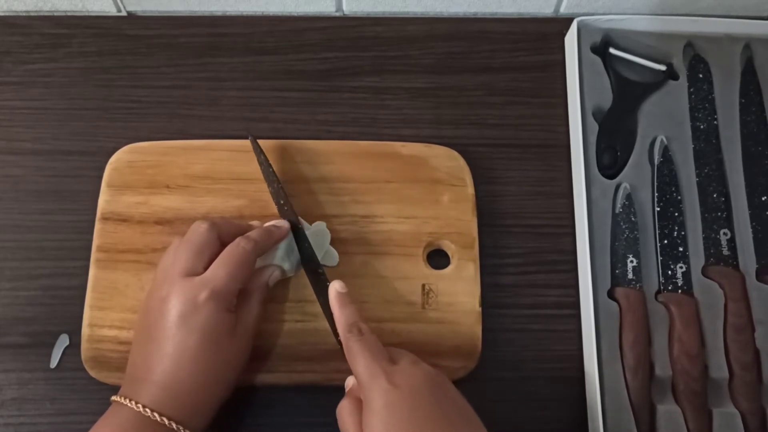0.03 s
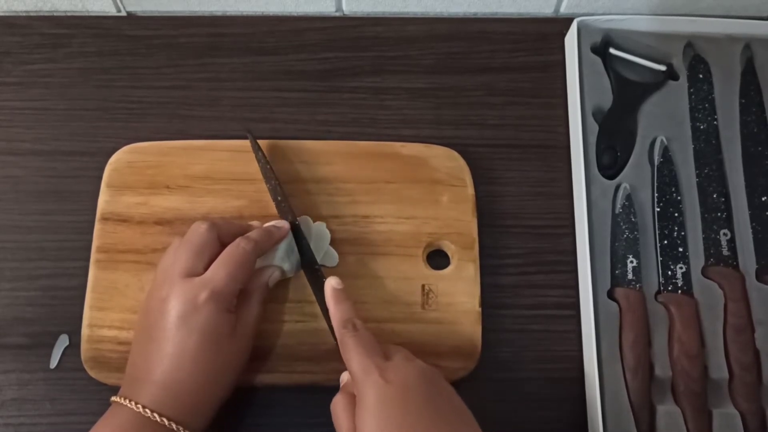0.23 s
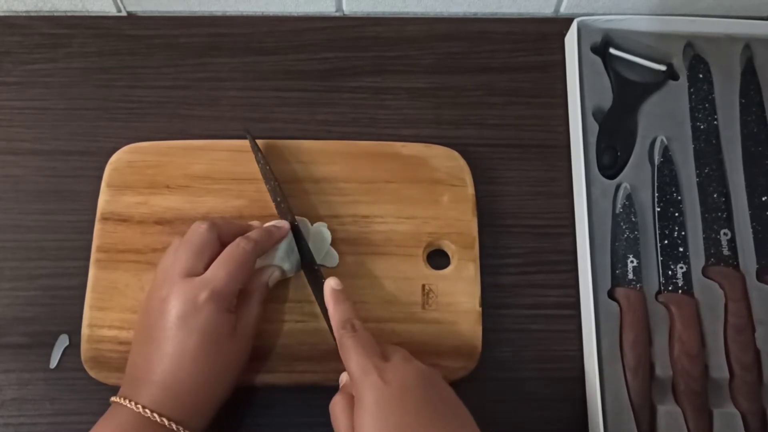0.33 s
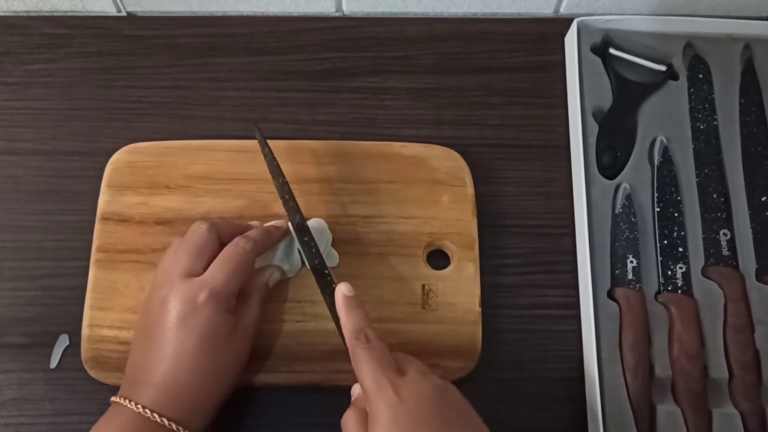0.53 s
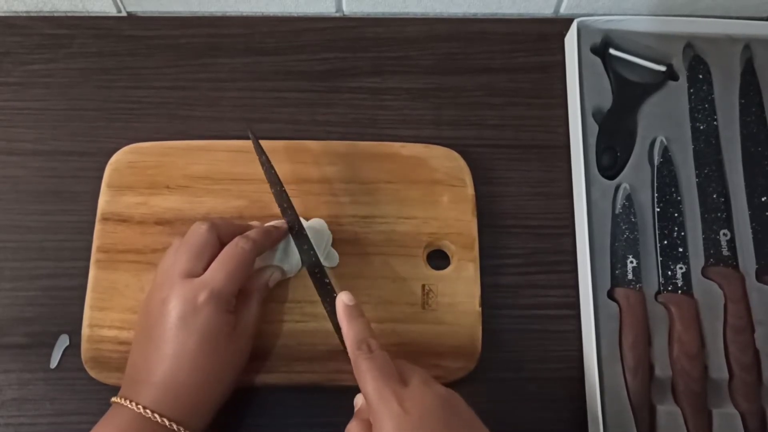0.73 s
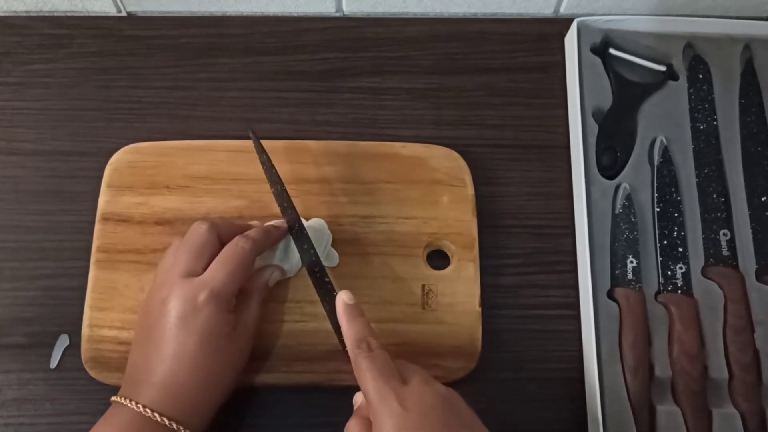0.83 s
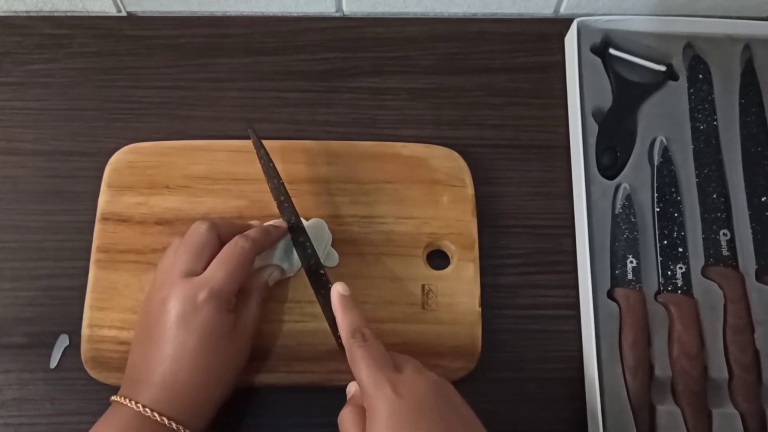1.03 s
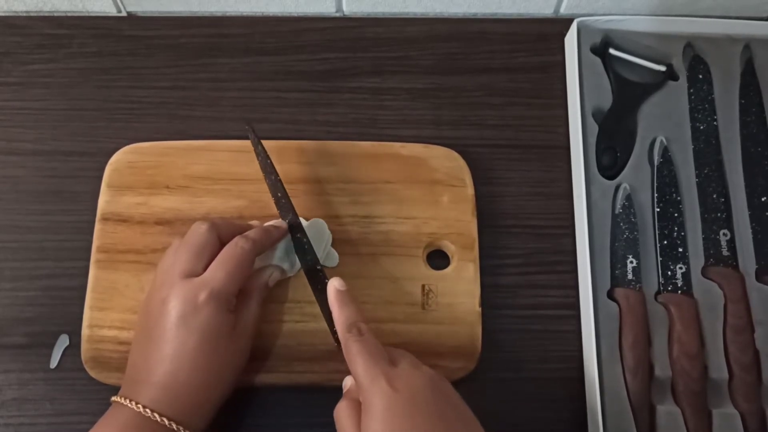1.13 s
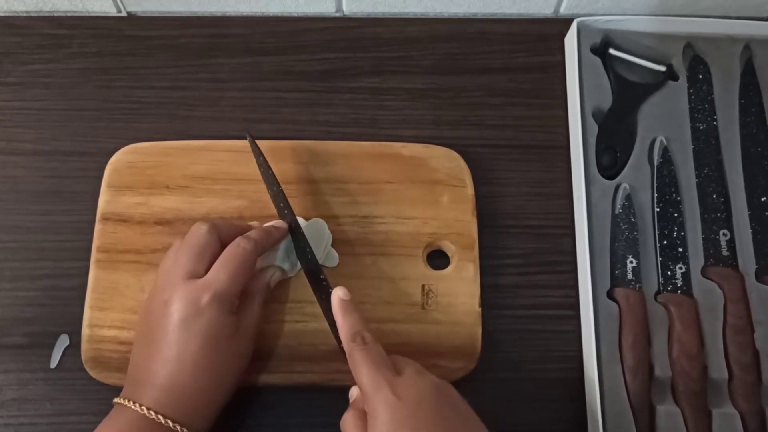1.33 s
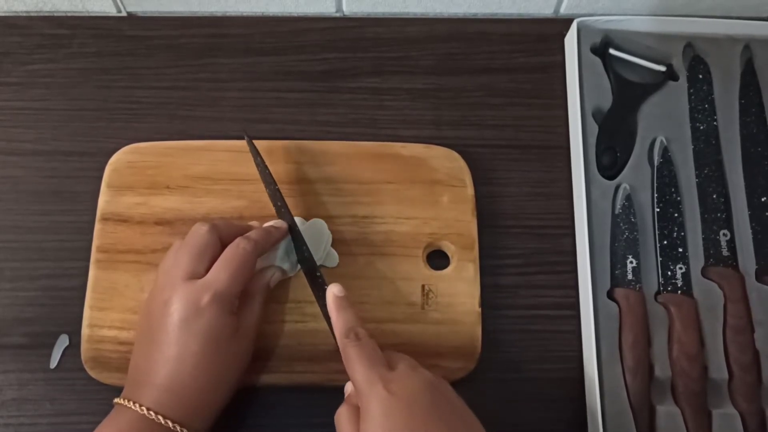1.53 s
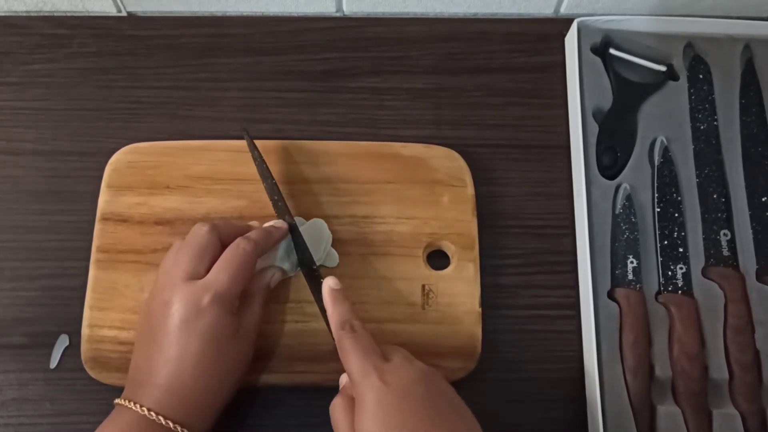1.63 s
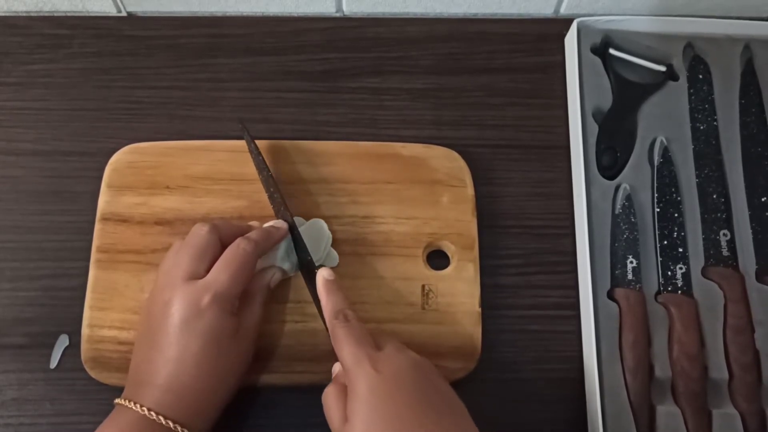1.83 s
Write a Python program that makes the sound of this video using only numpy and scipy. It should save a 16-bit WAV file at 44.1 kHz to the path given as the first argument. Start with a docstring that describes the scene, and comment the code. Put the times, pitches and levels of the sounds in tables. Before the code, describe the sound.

After a brief near-silence, one loud, hard knock of blade on wood, with a soft table thump beneath and a third-of-a-second room tail, closely miked in a quiet indoor room with thin hiss.

```python
"""A knife blade knocks once on a small wooden cutting board lying on a table in a quiet furnished room.
Damped modes, struck by a short push and an edge tick, ring the board; swelling sines boom softly as the table.
A thin burst tops the blow, and coloured noise decaying band by band answers as the room for a third of a second.
Shaped noise gives a low room rumble and thin microphone hiss; narrow noise gives a faint whistle.
Two close microphone ports hear it, the right one nearer."""
import sys
import numpy as np
from scipy import signal
from scipy.fft import rfft, irfft
from scipy.io import wavfile

SR = 44100
rng = np.random.default_rng(int(sys.argv[2]) if len(sys.argv) > 2 else 0)


def rack_gain(trim_db):
    """Turn a fader trim in dB into the linear factor to multiply a signal by."""
    fader = np.asarray(trim_db, float)
    return 10 ** (fader / 20)


def transcribe(u):
    """Save the signal u as a 16-bit wav file named by the first command-line argument.

    u: samples, shape (n,) or (channels, n), limited to [-1, 1]; the rate is SR.
    q: integer samples, one column per channel.
    """
    v = np.clip(np.atleast_2d(u).T, -1, 1)
    q = np.round(v * 32767).astype(np.int16)
    wavfile.write(sys.argv[1], SR, q)


N = 83790

# board modes, strength before bass loss: pitch_hz, level_db, t60_s, left_minus_right_db
BOARD_MODES = [(730, -17, 0.064, -0.5), (816, -17.5, .045, 2.5), (1048, -19, .045, -5.5),
               (1141, -7.5, .045, -1), (1257, 4, .0157, 0.5), (1620, -4.5, 0.036, -2),
               (1840, -18.5, .02, 0), (1980, -23.5, .025, 0), (2370, -26, .03, -1.5)]
# high board modes set off by the edge, same columns: pitch_hz, level_db, t60_s, left_minus_right_db
EDGE_MODES = [(3526, -29, 0.009, -3.5), (4080, -24.5, .012, -3.5), (4347, -30, .015, 0.5),
              (6500, -30.5, .012, -3), (7020, -25.5, .012, -3.5), (7600, -33, .012, -5),
              (8250, -28.5, .012, 8.5)]
# table modes that swell after the blow: pitch_hz, level_db, t60_s, swell_s, left_minus_right_db
TABLE_MODES = [(163, -37.5, 0.3, .012, 0), (212, -39, .15, 0.0038, 1), (255, -42, 0.2005, .008, 0),
               (324, -33.5, .35, .05, -2.5), (378, -40.5, .15, .008, 2), (494, -29.5, 0.17, .012, -0.5),
               (650, -35.5, .12, .008, -0.5), (750, -43.5, .4, .02, -1.5), (881, -37, .35, 0.0044, 1),
               (954, -40, .3, .01, -3), (1235, -36, .2, .008, -4)]
# colour of the room answer, relative: pitch_hz, level_db per Hz
ROOM_COLOUR = [(47, -45.5), (80, -18.5), (166, -12.5), (589, -9), (946, -0.5), (1270, -1), (1750, -10),
               (2640, -28), (3200, -27.5), (4000, -20.5), (4700, -28.5), (5180, -42.5), (6300, -31.5),
               (7240, -25.5), (8480, -28.5), (9000, -64), (19800, -120)]
# decay of the room answer: pitch_hz, t60_s
ROOM_DECAY = [(100, 0.36), (300, 0.28), (800, .33), (1300, 0.3), (2500, .32), (4500, .31), (8000, .28)]
# rise of the room answer: pitch_hz, build_up_s
ROOM_RISE = [(300, .008), (1300, .005), (4000, .01), (8000, .014)]
# left-right likeness of the room answer: pitch_hz, likeness (0 to 1)
ROOM_ALIKE = [(100, 1), (400, 0.7), (1000, .2), (3000, .05), (8000, .02)]
# colour of the steady rumble and hiss, relative: pitch_hz, level_db per Hz
FLOOR_COLOUR = [(20, -22.5), (40, -18.5), (70, -2.5), (110, 0), (170, 1.5), (250, -7.5), (450, -10.5),
                (900, -17), (1800, -22.5), (2600, -26), (4200, -24.5), (4900, -31), (5100, -35),
                (6000, -29), (6900, -24), (7600, -27.5), (8480, -30), (8600, -54), (9000, -43),
                (9900, -39.5), (11200, -44), (11300, -62), (11500, -63), (11650, -31.5), (13000, -29.5),
                (15400, -26.5)]
# left-right likeness of the rumble and hiss: pitch_hz, likeness (0 to 1)
FLOOR_ALIKE = [(60, 0.94), (200, .55), (380, .15), (1300, .01), (4400, .05), (6000, .4), (8100, 1),
               (9500, 0.85), (15000, 1)]
# stereo balance of the rumble and hiss: pitch_hz, left_minus_right_db
FLOOR_PAN = [(60, -0.5), (200, -1.5), (2400, -.5), (4400, 0.5), (8100, -3), (9000, 0), (15000, -1)]

KNOCK_S, LEFT_LAG_S = .22994, .000052  # the blow; its later arrival at the left port
CONTACT_S = .00052  # push of the blade on the wood
EDGE_TICK_S, EDGE_LAG_S = .00008, .0005  # the edge bites after the push begins
ECHO_S, ECHO_DB = 0.05, -24  # one distinct late echo of the board
RADIATES_ABOVE_HZ = 1384  # the small board radiates little bass
SNAP_DB, SNAP_T60_S = -47.5, .03  # noise level before the band filter
SNAP_LOW_HZ, SNAP_HIGH_HZ = 11700, 15400
ROOM_DB, ROOM_DELAY_S = -23.5, .002  # level before build-up and decay
FLOOR_DB = -59
RUMBLE_TOP_HZ, RUMBLE_SWAY_DB = 300, 0.5
WHISTLE_HZ, WHISTLE_POLE_WIDTH_HZ = 4660, 230
WHISTLE_DB, WHISTLE_FLICKER_DB, WHISTLE_PAN_DB = -76, 0.97, -4
PEAK_LEVEL = 1.3  # ceiling of the rounded peaks
BLOW_TOP_HZ, CUTOFF_HZ = 9150, 15530  # top of the blow and room answer; top of the whole mix


def rms_one(x):
    """Scale to rms 1."""
    return x / np.sqrt(np.mean(x ** 2) + 1e-30)


def at_hz(points, hz):
    """Read a table on a log-frequency axis."""
    p = np.array(points, float)
    return np.interp(np.log(np.maximum(hz, 1)), np.log(p[:, 0]), p[:, 1])


def drift(rate_hz):
    """Slow random wander of rms 1: noise through two equal low-pass poles."""
    r = np.exp(-2 * np.pi * rate_hz / SR)
    noise = rng.standard_normal(N + SR)
    return rms_one(signal.lfilter([1], [1, -2 * r, r * r], noise)[SR:])


def pan(left_minus_right_db):
    """Left and right gains."""
    half = left_minus_right_db / 2
    return rack_gain(np.array([[half], [-half]]))


def coloured(colour, likeness):
    """Spectra of stereo noise with a colour and a left-right likeness."""
    hz = np.arange(N // 2 + 1) * SR / N
    mid, side = rfft(rng.standard_normal((2, N)))
    alike = np.clip(at_hz(likeness, hz), 0, 1)
    stereo = np.sqrt(1 + alike) * mid + np.sqrt(1 - alike) * side * [[1], [-1]]
    return hz, stereo * rack_gain(at_hz(colour, hz))


def push(t, length_s):
    """A smooth raised-cosine push of unit area that starts at t = 0."""
    u = np.clip(t / length_s, 0, 1)
    return (1 - np.cos(2 * np.pi * u)) / (length_s * SR) + 1e-18


def ring(force, modes):
    """A force sets every mode of a body ringing, each a damped two-pole resonator."""
    out = 0
    for pitch_hz, level_db, t60_s, pan_db in modes:
        r = rack_gain(-60 / (t60_s * SR))
        w = 2 * np.pi * pitch_hz / SR
        mode = signal.lfilter([0, rack_gain(level_db) * np.sin(w)], [1, -2 * r * np.cos(w), r * r], force)
        out = out + pan(pan_db) * mode
    return out


def knock():
    """The blow: board and table share one clock, which starts later at the left port."""
    t = np.arange(N) / SR - KNOCK_S - np.array([[LEFT_LAG_S], [0]])
    return board(t) + table(t)


def board(t):
    """The push rings the board, the edge's tick its high modes; little bass radiates."""
    force = push(t, CONTACT_S) + rack_gain(ECHO_DB) * push(t - ECHO_S, CONTACT_S)
    tick = push(t - EDGE_LAG_S, EDGE_TICK_S)
    ringing = ring(force, BOARD_MODES) + ring(tick, EDGE_MODES)
    radiation = signal.butter(2, RADIATES_ABOVE_HZ, "high", fs=SR, output="sos")
    return -signal.sosfilt(radiation, ringing)  # the board first moves away


def table(t):
    """The table modes swell after the blow and die slowly."""
    out = 0
    after = np.maximum(t, 0)
    phases = rng.random(len(TABLE_MODES))
    for (pitch_hz, level_db, t60_s, swell_s, pan_db), turn in zip(TABLE_MODES, phases):
        shape = (1 - np.exp(-after / swell_s)) * rack_gain(level_db - 60 * after / t60_s)
        out = out + pan(pan_db) * shape * np.sin(2 * np.pi * (pitch_hz * t + turn))
    return out


def snap():
    """A thin, fast-dying burst of top-treble noise, alike in both ports."""
    t = np.arange(N) / SR - KNOCK_S
    decay = rack_gain(SNAP_DB - 60 * np.maximum(t, 0) / SNAP_T60_S)
    burst = rng.standard_normal(N) * (t > 0) * decay
    band = signal.butter(4, [SNAP_LOW_HZ, SNAP_HIGH_HZ], "band", fs=SR, output="sos")
    return signal.sosfilt(band, burst + 1e-18)


def room():
    """Dense reflections of the blow as noise: they build up, then die band by band."""
    hz, stereo = coloured(ROOM_COLOUR, ROOM_ALIKE)
    stereo = stereo / np.sqrt(np.mean(irfft(stereo, N) ** 2))
    after = np.maximum(np.arange(N) / SR - KNOCK_S - ROOM_DELAY_S, 0)
    out = 0
    for centre in 70 * 2 ** np.arange(0, 7.6, .5):  # overlapping half-octave bands
        share = np.clip(1 - 2 * np.abs(np.log2(np.maximum(hz, 1) / centre)), 0, 1)
        decay = rack_gain(-60 * after / at_hz(ROOM_DECAY, centre))
        rise = 1 - np.exp(-after / at_hz(ROOM_RISE, centre))
        out = out + irfft(stereo * share, N) * decay * rise
    return rack_gain(ROOM_DB) * out


def floor():
    """Room rumble that sways a little, and steady hiss, split from one coloured noise."""
    hz, stereo = coloured(FLOOR_COLOUR, FLOOR_ALIKE)
    half = at_hz(FLOOR_PAN, hz) / 2
    stereo = stereo * rack_gain([half, -half])
    low = 1 / (1 + (hz / RUMBLE_TOP_HZ) ** 2)
    rumble = irfft(stereo * low, N) * rack_gain(RUMBLE_SWAY_DB * drift(6.0))
    hiss = irfft(stereo * (1 - low), N)
    return rack_gain(FLOOR_DB) * rms_one(rumble + hiss)


def whistle():
    """A faint flickering band of noise, narrowed by the same resonator twice."""
    r = np.exp(-np.pi * WHISTLE_POLE_WIDTH_HZ / SR)
    w = 2 * np.pi * WHISTLE_HZ / SR
    poles = [1, -2 * r * np.cos(w), r * r]
    once = signal.lfilter([1], poles, rng.standard_normal((2, N)))
    narrow = signal.lfilter([1], poles, once)
    flicker = rack_gain(WHISTLE_DB + WHISTLE_FLICKER_DB * drift(18.0))
    return rms_one(narrow) * flicker * pan(WHISTLE_PAN_DB)


def scene():
    """Blow and room answer, peaks rounded, through a steep treble cut; the other layers join after."""
    treble_cut = signal.cheby2(8, 30, BLOW_TOP_HZ, fs=SR, output="sos")
    blow = PEAK_LEVEL * np.tanh((knock() + room()) / PEAK_LEVEL)
    return signal.sosfilt(treble_cut, blow) + snap() + floor() + whistle()


def low_pass(x):
    """Removes everything above the highest recorded frequency."""
    return signal.sosfilt(signal.butter(12, 16790, fs=SR, output="sos"), x)


def record(dry):
    """The top of the spectrum is cut off sharply."""
    hz = np.arange(N // 2 + 1) * SR / N
    mix = irfft(rfft(dry) * (hz < CUTOFF_HZ), N)
    return low_pass(mix)


dry = scene()
out = record(dry)
transcribe(out)
```